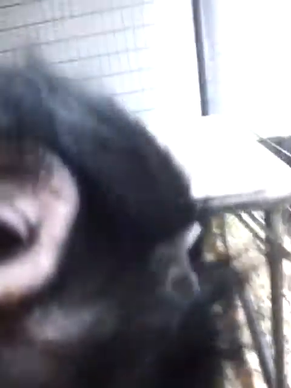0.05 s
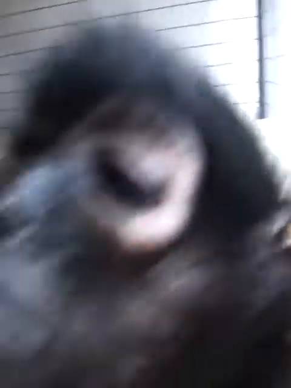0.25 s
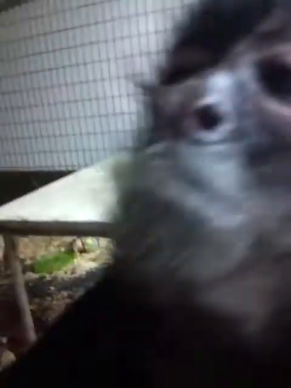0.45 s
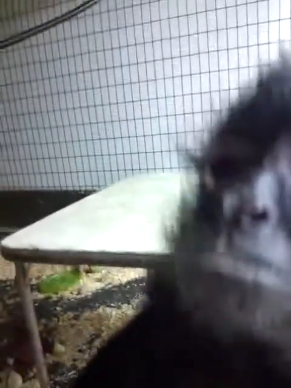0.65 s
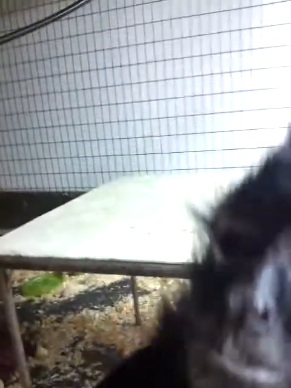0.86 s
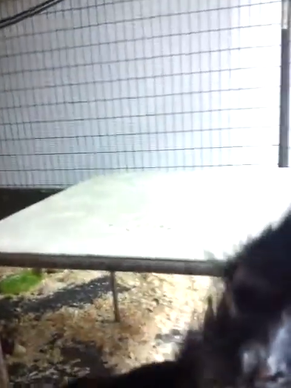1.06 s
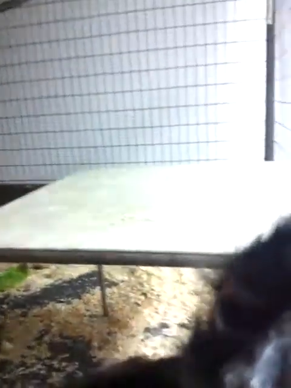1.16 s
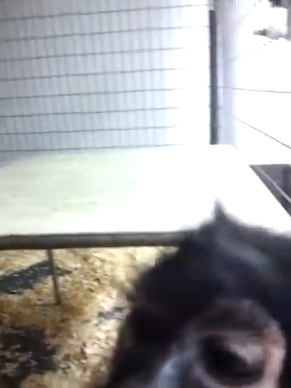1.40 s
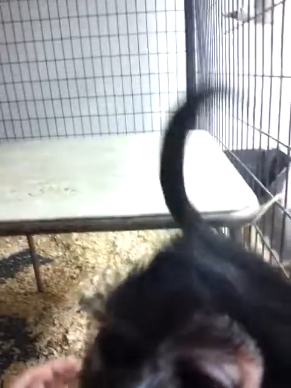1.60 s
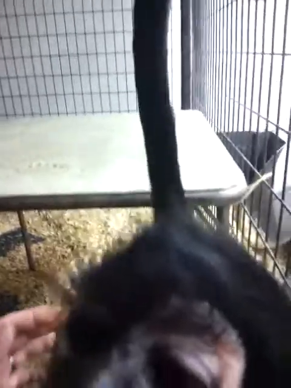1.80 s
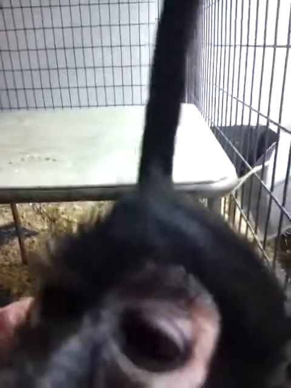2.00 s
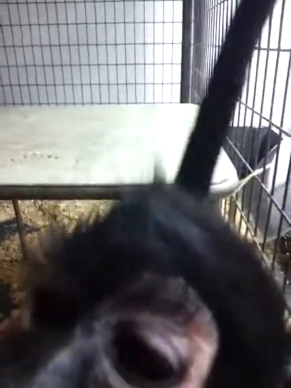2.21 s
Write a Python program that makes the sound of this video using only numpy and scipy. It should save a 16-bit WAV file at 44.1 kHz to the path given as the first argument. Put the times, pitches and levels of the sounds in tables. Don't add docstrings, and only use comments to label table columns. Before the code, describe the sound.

Very close monkey sounds: wet mouth clicks, tiny breath puffs and very short squeaks leaping from rough creak to clear whistle, with soft low thumps, slight ringing from a bare mesh-walled room, and quiet phone hiss.

```python
import sys
import numpy as np
from scipy import signal
from scipy.fft import rfft, irfft, next_fast_len
from scipy.io import wavfile
from scipy.ndimage import uniform_filter1d, map_coordinates

SR = 44100
rng = np.random.default_rng(int(sys.argv[2]) if len(sys.argv) > 2 else 0)


def to_wav(sig):
    pcm = np.clip(np.atleast_2d(sig), -1, 1) * 32767
    pcm = np.round(pcm).astype(np.int16)
    wavfile.write(sys.argv[1], SR, pcm.T)


def makeup_ratio(level_db):
    decades = np.asarray(level_db, float) / 20
    return 10 ** decades


N = 99225
T = np.arange(N) / SR
TOP_HZ = 16490


def unit(x):
    return x / np.sqrt(np.mean(x ** 2) + 1e-20)


def along(points, hz):
    f, v = np.transpose(points)
    return np.interp(np.log(hz + 1), np.log(f + 1), v)


def wobble(rate):
    knots = rng.standard_normal(int(N * rate / SR) + 4)
    return map_coordinates(knots, [T * rate])


def filtered(x, response):
    m = next_fast_len(N + SR // 2)
    return irfft(rfft(x, m) * response(np.fft.rfftfreq(m, 1 / SR)), m)[..., :N]


def noise(spectrum):
    return unit(filtered(rng.standard_normal(N), lambda hz: makeup_ratio(along(spectrum, hz))))


def resonance(f, centre, width, db):
    return makeup_ratio(db) * 1j * f * width / (centre ** 2 - f ** 2 + 1j * f * width)


def floor(monkey):
    # Hz, dB per Hz.
    hiss_colour = [(25, -16), (60, -2), (130, -8), (300, -7), (1100, -22.5), (8500, -20.5), (13500, -30),
                   (15000, -79)]
    # Hz, level in dB.
    tones = [(120, -62.5), (15734, -56)]
    # Hz, dB per Hz.
    buffet_colour = [(60, 8.5), (200, 12), (400, -54.5)]
    hiss = makeup_ratio(-54.5 + 1.83 * wobble(10.22)) * noise(hiss_colour)
    lines = sum(makeup_ratio(db + 3.0 + wobble(15)) * np.sin(2 * np.pi * hz * T) for hz, db in tones)
    loudness = np.sqrt(np.abs(uniform_filter1d(monkey ** 2, size=1500)))
    buffet = makeup_ratio(-40.5 - 7 * wobble(23.0)) * loudness * noise(buffet_colour)
    return hiss + lines + buffet


def tract(drive):
    # centre in Hz, width in Hz, gain in dB.
    chest = [(453.4, 102, 11.66)]
    jaw = [(950, 1114, -3.5), (1617, 547, -2.5)]
    mouth = [(2054, 450, -9), (2614, 550, -1.5)]
    throat = [(3297, 525, 0.17)]
    nose = [(4970, 734, -5.5)]
    teeth = [(6510, 390, -9), (8720, 510, -23), (10930, 700, -36.5), (13400, 1700, -20)]
    skirt_hz = 7560
    out, k = 0, 0
    for x, group in zip(drive, (chest, jaw, mouth, throat, nose, teeth)):
        soft_walls = group is not teeth

        def response(f):
            ring = sum((-1) ** (k + j) * resonance(f, *row) for j, row in enumerate(group))
            dulled = ring / (1 + 1j * f / skirt_hz * soft_walls) ** 2
            return dulled / (1 + (f / 14800) ** 20)

        out = out + filtered(x, response)
        k += len(group)
    return out


def puffs():
    # start in seconds, length in seconds, level in dB.
    breaths = [(0, 0.014, -31.5), (0.106, 0.078, -47), (0.444, 0.06, -40.5), (0.892, 0.03, -45.5),
               (1, 0.013, -44.5), (1.082, 0.0099, -52), (1.25, 0.024, -52), (1.368, 0.021, -43.5),
               (1.523, 0.0067, -41.5), (1.745, 0.0045, -43.5), (1.91, 0.009, -54), (1.325, 0.029, -39),
               (1.583, 0.013, -33.5), (1.795, 0.065, -37.5), (1.963, 0.027, -43.5), (2.088, 0.14, -50.5)]
    # Hz, dB per Hz.
    air_colour = [(880, -13.5), (1500, -11), (4310, 2), (8970, 2), (13800, -62.5), (14900, -11.5),
                  (15500, -47)]
    rise_s, fall_s = 0.005, 0.013
    shape = 0
    for s, length, db in breaths:
        before, after = np.maximum(s - T, 0), np.maximum(T - s - length, 0)
        shape = shape + makeup_ratio(db) * np.exp(-before / rise_s - after / fall_s)
    bubbles = rng.random(size=(6, N)) < 300 / SR
    crackle = tract(makeup_ratio(23) * bubbles * rng.standard_normal(size=(6, N)))
    return shape * makeup_ratio(3.4 * wobble(200)) * (noise([(300, -50)] + air_colour) + crackle)


def room(x):
    # Hz, seconds to fall 60 dB.
    decay = [(300, 0.47), (1500, 0.31), (2900, 0.16), (3350, 0.39), (3900, 0.15), (6000, 0.35),
             (12000, 0.28)]
    # centre in Hz, width in Hz, gain in dB.
    mesh = (3350, 83, 1)
    hz, t, z = signal.stft(rng.standard_normal(SR // 2), SR, nperseg=256)
    fade = makeup_ratio(-60 * t / along(decay, hz)[:, None])
    tail = signal.istft(z * fade, SR, nperseg=256)[1]
    x = filtered(x, lambda f: 1 + resonance(f, *mesh))
    late = np.pad(x, (round(0.0062 * SR), 0))
    return signal.fftconvolve(late, tail / np.linalg.norm(tail))[:N]


def clicks():
    # time in seconds, peak in dB, chest and nose in dB against the throat.
    early = [(.116, -24.5, -18, 31.5), (0.1338, -17, -5.5, 18), (0.189, -21.5, -5, 22.5),
             (.1935, -8.5, -9, -14.5), (0.206, -0.5, -9.5, 9), (0.2101, -7.5, -25, 10),
             (.400, -8.5, -31, 3.5), (.418, -21, -16, 20), (.422, -26, 7.5, -15), (0.8226, -31.5, 1, 22.5),
             (0.846, -24.5, -28, 13.5), (.9035, -23.5, -6, 18.5), (.9155, -19, -4.5, -1),
             (.920, -21.5, -5.5, -13), (.933, -32, 0.5, 1), (1.011, -20, -4, 17.5),
             (1.022, -15.5, -14, 21.5), (1.036, -36, 12, 27)]
    late = [(1.082, -7, -14, 10), (1.089, -8.5, -8, 8), (1.092, -9.5, -30, -3), (1.097, -9, -6, -30),
            (1.238, -23.5, -11, 27), (1.329, -13.5, -9, 16), (1.524, -13.5, -6, 13), (1.537, -6, -9, 10),
            (1.55, -6.5, -23, -25), (1.559, -3.5, -11, 12), (1.562, -5, -7, -4), (1.739, -2, -9.5, -22),
            (1.748, -5.5, -3, 12), (1.752, -4.5, -7, -59), (1.756, -1.5, -4, -55), (1.795, -21.5, 7, -6),
            (1.799, -7.5, -8.5, 3), (1.864, -32, -15, 15), (1.956, -8, -7, 4), (2.118, -23.5, -40, 18.5)]
    further = [(.147, -36, 0, 11), (0.158, -34, -3, 31), (0.2031, -11, -24, 18.5), (0.225, -24.5, 0, 18),
               (0.372, -29, -5, 21), (.599, -37, -5, 20.5), (.909, -37, -21, 26), (.995, -27.5, -16, 15),
               (1.002, -33, 1, 2), (1.016, -21, -9, 12), (1.078, -17.5, -9, 17), (1.085, -4.5, -13, -4),
               (1.094, -11.5, -4, 11.5), (1.266, -43.5, 14.5, 15), (1.291, -21, -16, -9), (1.318, -32, 8, 5),
               (1.324, -24, 2, 14), (1.411, -27.5, -2, 20), (1.444, -34, -15, 6), (1.47, -26.5, -10, 15),
               (1.509, -27.5, -8, -8), (1.530, -19, -8, 16), (1.544, -15, -27, -7), (1.647, -11.5, -18, -8),
               (1.687, -23.5, -13, 12.5), (1.735, -23, 2.5, -2), (2.166, -34.5, -25, 22),
               (2.223, -30, -5.5, -9)]
    group_db = (23.6, 20.8, 18.6, 18.4, 9.4, 10.5)
    snap_s, push_s, scatter_db = 0.0013, 0.00027, 1.5
    rows, t = np.array(early + late + further), np.arange(300) / SR
    drive = np.zeros((6, N + len(t)))
    luck = rng.standard_normal((len(rows), len(t) + 1))
    push = t * np.exp(-t / push_s)
    push = push / push.sum()
    for (s, db, chest_db, nose_db), u in zip(rows, luck):
        snap = np.exp(-t / snap_s) * u[1:]
        snap = snap / np.linalg.norm(snap)
        balance = [chest_db, chest_db, scatter_db * u[0], 0, nose_db, nose_db]
        gains = makeup_ratio(db + np.add(group_db, balance))
        start = round(s * SR)
        drive[:, start:start + len(t)] += gains[:, None] * [push, snap, snap, snap, snap, snap]
    return tract(drive[:, :N])


def thumps():
    # start in seconds, peak in dB, pitch in Hz.
    bumps = [(.13, -44.5, 70), (.20, -44, 83), (.262, -42, 35), (0.29, -33, 231), (0.442, -50, 133),
             (0.921, -42.5, 160), (1.091, -37.5, 179), (1.358, -34, 56.5), (1.09, -45, 40),
             (1.875, -35.5, 124), (2.019, -46.5, 70)]
    out = 0
    for s, db, hz in bumps:
        cycles = np.maximum(T - s, 0) * hz
        out = out + makeup_ratio(db) * cycles * np.exp(1 - cycles / 0.85) * np.sin(2 * np.pi * cycles)
    return out


def calls():
    # time in seconds, pitch in Hz, level in dB, roughness 0-1.
    early = [
        ((-31.5, -14, -7.5, -5, -7.5), [(.252, 407, -35, 0.5), (.2565, 404.3, -17.5, 0.47), (.260, 404, -8.5, .15), (.271, 420, -6.5, 0.02), (.274, 836.5, -6, 0.12), (.281, 808, -11.5, 0.3), (.287, 898, -12, 0.1), (.298, 865, -21, 0.8)]),
        ((-10, -10, -7.5, 6, -29), [(.432, 1061, -25, 0.88), (.436, 1070, -10, 0.34), (.4385, 1282, -11.5, 0.08), (.442, 1460, -11, 0.32), (.446, 1453, -20.5, 0.1), (.448, 1649, -7.5, 0), (.4525, 1481, -12.5, 0.14), (.457, 1632, -14, 0.31), (.460, 1600, -30, 0.2)]),
        ((-18.5, -8.5, -2.5, -2, -4.5), [(1.152, 710.5, -33, 0.08), (1.161, 751.2, -25, 0.88), (1.164, 777, -12.5, 0.46), (1.168, 778, -10, 0.68), (1.172, 858, -10, 0.08), (1.179, 839.5, -16.5, 0.29), (1.183, 778, -17.5, 0.8), (1.187, 800, -43, 0.1)]),
    ]
    middle = [
        ((-18, -10.5, -7.5, -3.5, -3.5), [(1.331, 1133, -38, 1), (1.335, 1224, -9.5, 0.82), (1.338, 1332, -15, 0.67), (1.343, 1482, -9.5, 0.34), (1.352, 1740, -6.5, 0.022), (1.356, 1671, -20, 0.079), (1.359, 1660, -18, 0.12)]),
        ((-22.5, -10.5, -9, -11, -4.5), [(1.565, 894, -27.5, 1), (1.568, 829, -13.5, 0.9), (1.571, 811, -8.5, 0.44), (1.576, 878, -15, 1), (1.578, 1493, -2, 0.059), (1.583, 1666, -13.5, 0.022), (1.592, 1492, -15.5, 0.098), (1.596, 1395, -11.5, 0.24)]),
    ]
    late = [
        ((22.5, -9, -17, -5, -12), [(1.596, 439, -65, 0.67), (1.604, 447, -64, 1), (1.613, 442, -62, 1), (1.621, 369, -68, 0.41), (1.632, 383, -49.5, .1), (1.641, 411, -71, .3), (1.655, 410, -80, .5)]),
        ((-9, -4.5, 4.5, -42.5, -24), [(1.801, 950, -13.5, 0.97), (1.805, 1145, -11, 0.067), (1.812, 1210, -14, 0.012), (1.82, 1423, -25, 0.044), (1.829, 1530, -52, 0.044)]),
        ((5, 7, 8, -3.5, -3.5), [(1.887, 2357, -56, 0.023), (1.889, 1974, -10, 0.028), (1.893, 1933, -6.5, 0.013), (1.897, 1237, -20, 0.05), (1.903, 810.5, -19.5, 0.21), (1.909, 549, -22.5, 0.3), (1.921, 447, -82, 0.76)]),
        ((6, 3.5, 7.5, -38, -37), [(1.959, 718, -34, 0.12), (1.961, 757, -25, 0.28), (1.965, 838, -24.5, .05), (1.973, 935, -38.5, 0.036)]),
    ]
    jitter, scatter_db, alternate, voice_db = 0.12, 8.5, 0.26, 10.5
    drive, shake, hiss = np.zeros((6, N)), wobble(900), rng.standard_normal(N)
    k = np.arange(1, 45)[:, None]
    for (chest_db, jaw_db, mouth_db, nose_db, teeth_db), points in early + middle + late:
        s, hz, db, rough = np.transpose(points)
        i = np.arange(round(s[0] * SR), round(s[-1] * SR))
        hz, db = np.interp(T[i], s, hz), np.interp(T[i], s, db)
        rough = np.interp(T[i], s, np.clip(rough, 0, 1))
        cycles = np.cumsum(hz * (1 + jitter * rough * shake[i])) / SR
        harmonics = np.cos(2 * np.pi * k * cycles) * (k * hz < TOP_HZ)
        pulses = np.sum(harmonics, axis=0) * np.sqrt(2 * hz / TOP_HZ)
        count = np.floor(cycles + .5).astype(int)
        uneven = makeup_ratio(scatter_db * rough * rng.standard_normal(size=200)[count])
        size = uneven * (1 + alternate * rough * (-1) ** count)
        gate = 1 + np.cos(2 * np.pi * cycles)
        voice = makeup_ratio(db + voice_db) * size * (pulses + rough * gate * hiss[i])
        drive[:, i] += voice * makeup_ratio([[chest_db], [jaw_db], [mouth_db], [0], [nose_db], [teeth_db]])
    return tract(drive)


def scene():
    monkey = calls() + clicks() + puffs()
    return (monkey + makeup_ratio(-17.5) * room(monkey) + thumps() + floor(monkey))[None]


def low_pass(x):
    return signal.sosfilt(signal.butter(12, 16490, fs=SR, output="sos"), x)


def record(dry):
    mic_hz, limit, low_hz = 9300, 1.3, 70
    soft = filtered(dry, lambda hz: 1 / (1 + 1j * hz / mic_hz) ** 2)
    held = soft / (1 + np.abs(soft / limit) ** 4) ** (1 / 4)
    mix = filtered(held, lambda hz: (hz < TOP_HZ) * (1j * hz / (low_hz + 1j * hz)) ** 2)
    return low_pass(mix)


dry = scene()
out = record(dry)
to_wav(out)
```